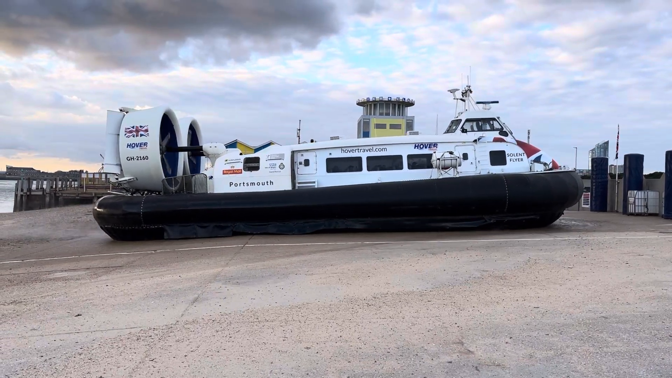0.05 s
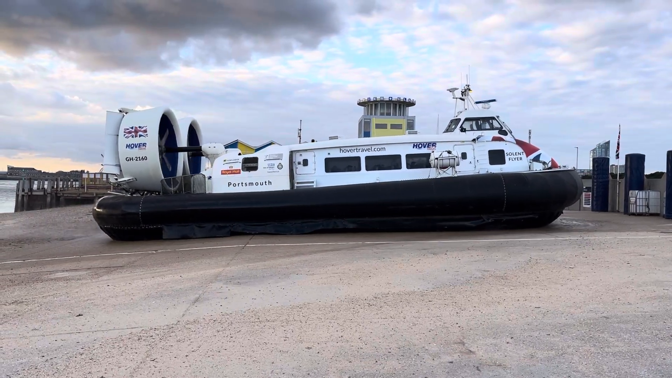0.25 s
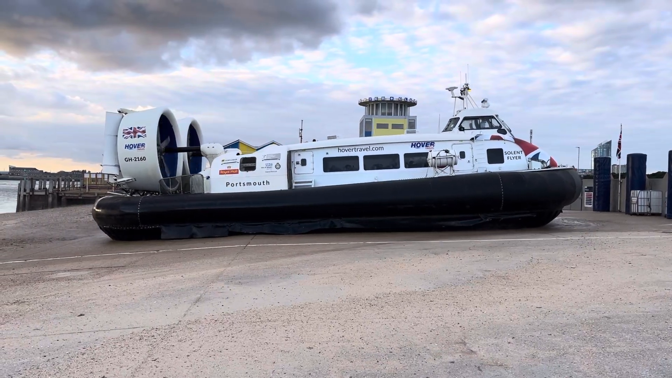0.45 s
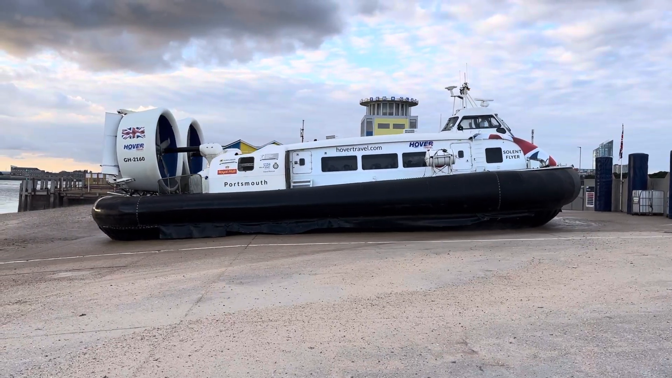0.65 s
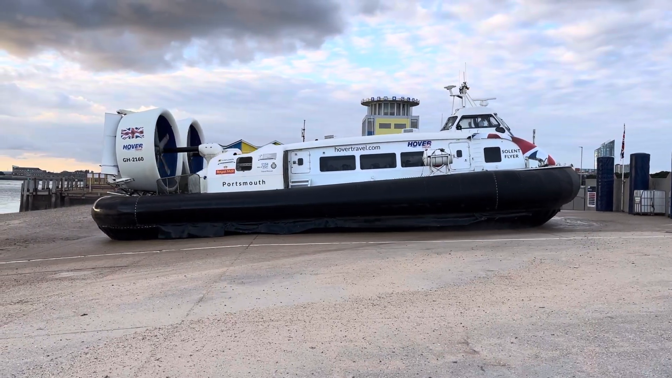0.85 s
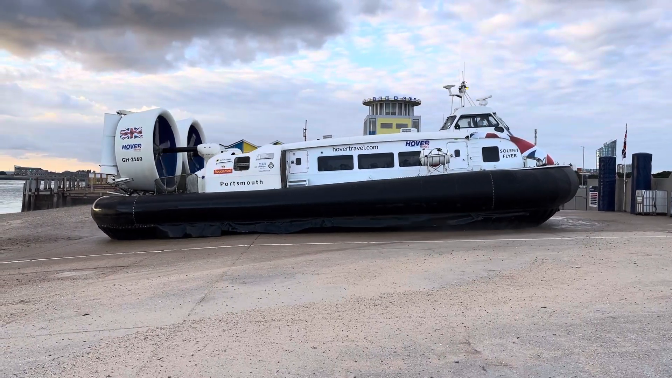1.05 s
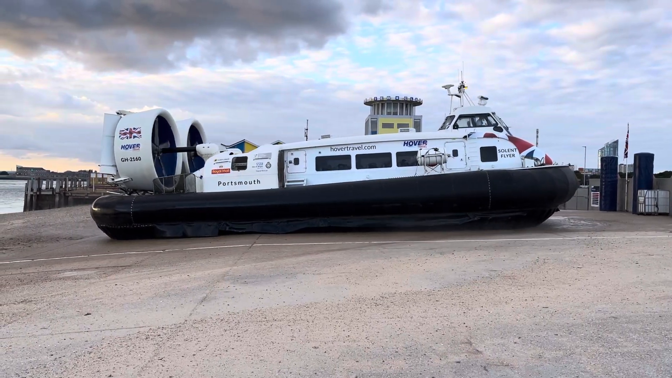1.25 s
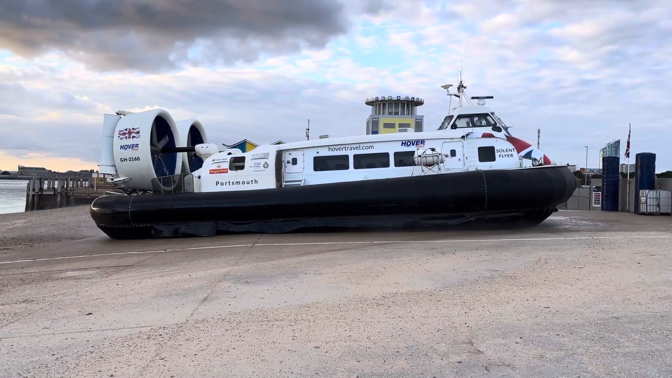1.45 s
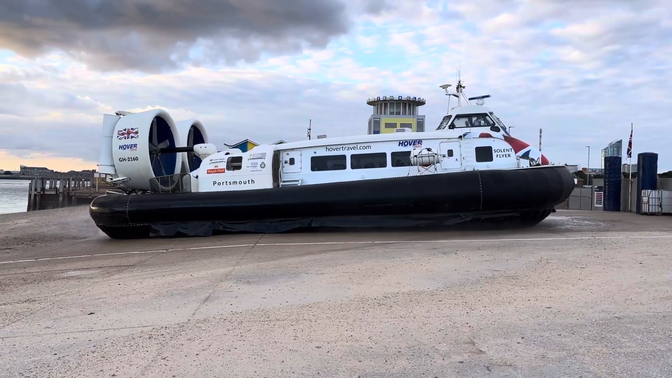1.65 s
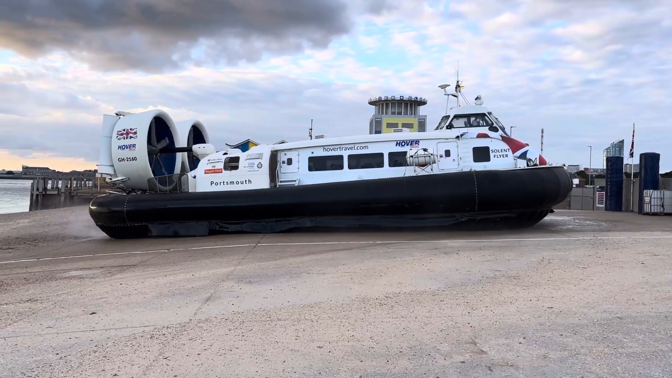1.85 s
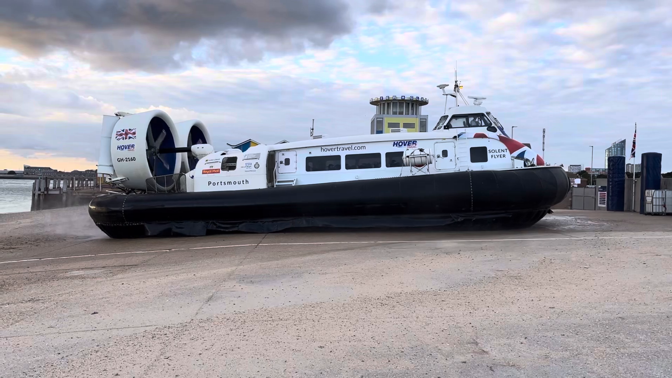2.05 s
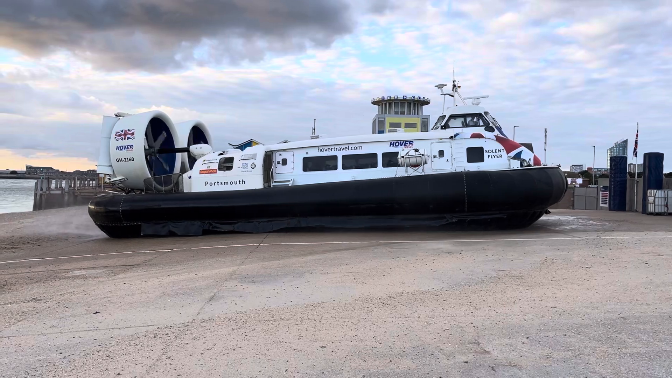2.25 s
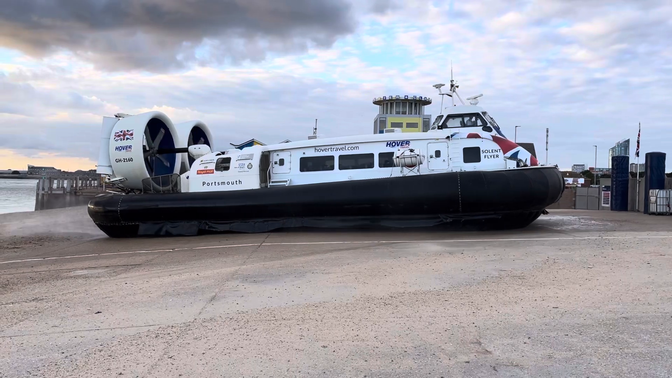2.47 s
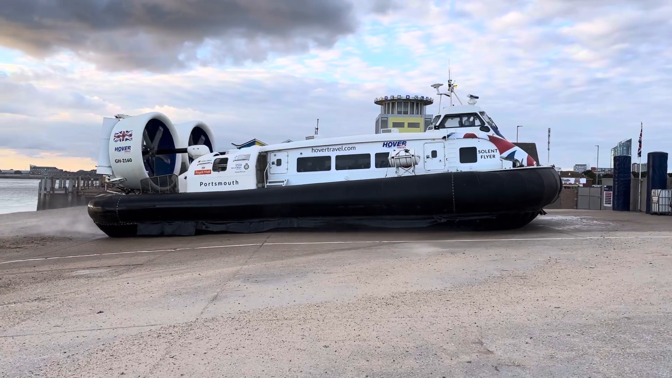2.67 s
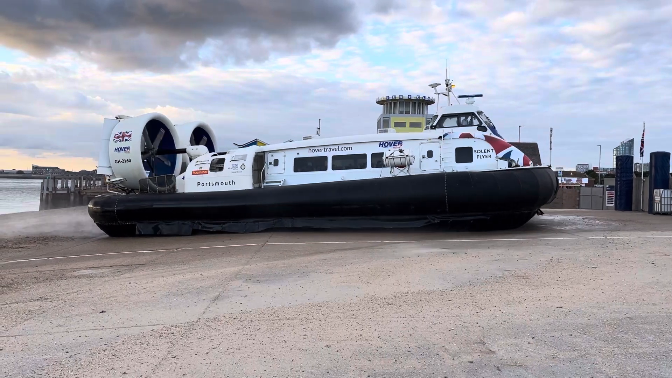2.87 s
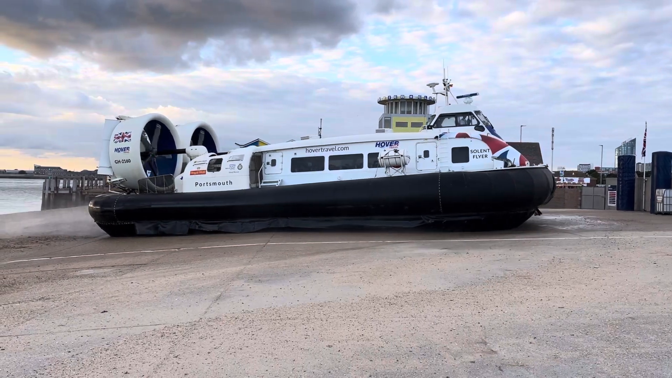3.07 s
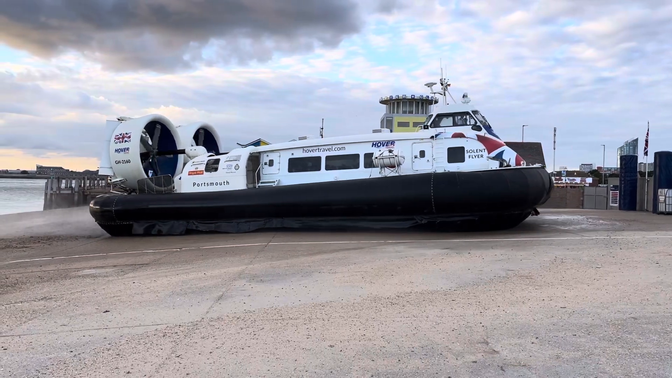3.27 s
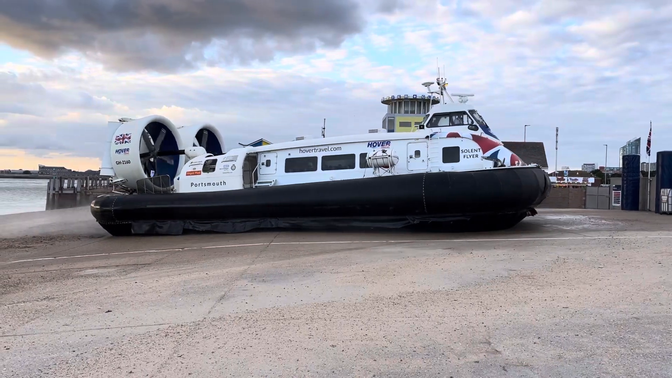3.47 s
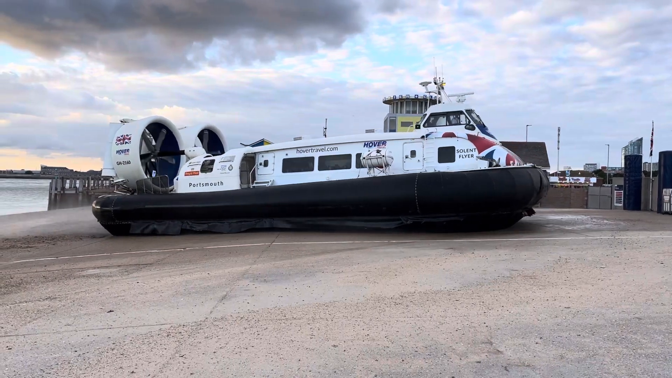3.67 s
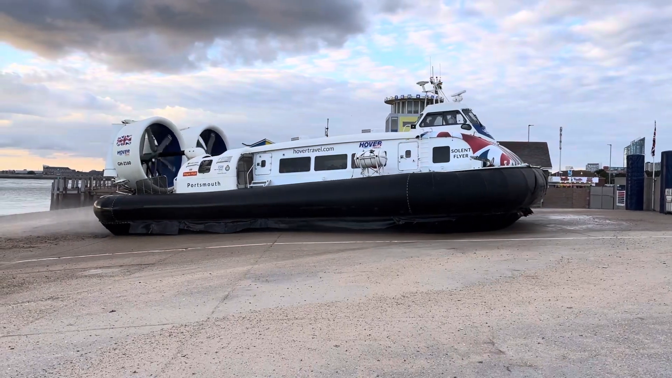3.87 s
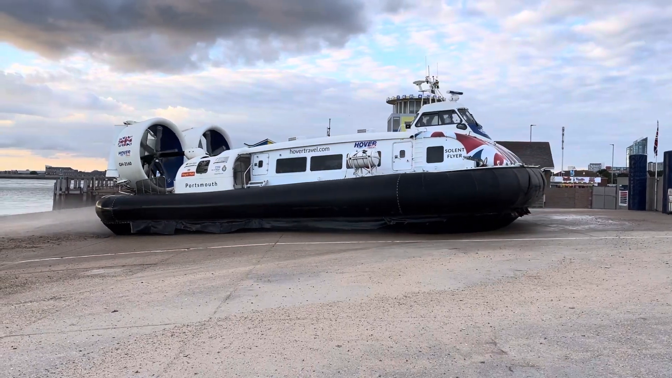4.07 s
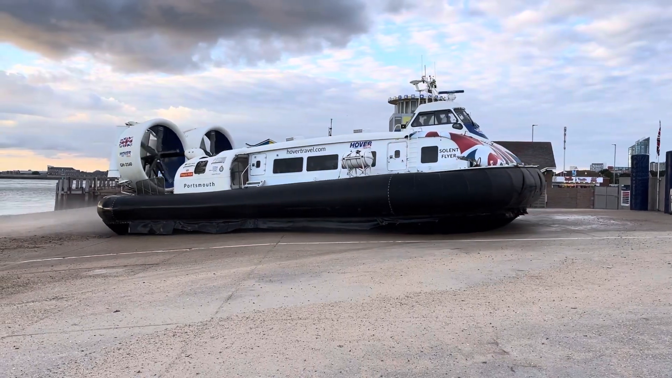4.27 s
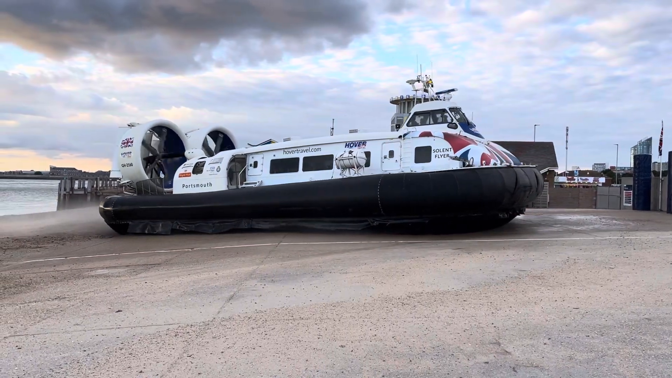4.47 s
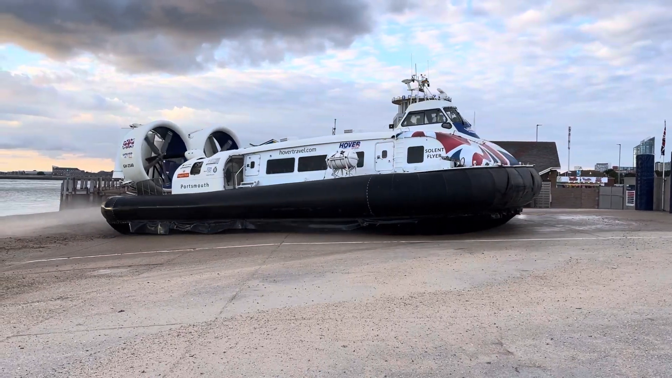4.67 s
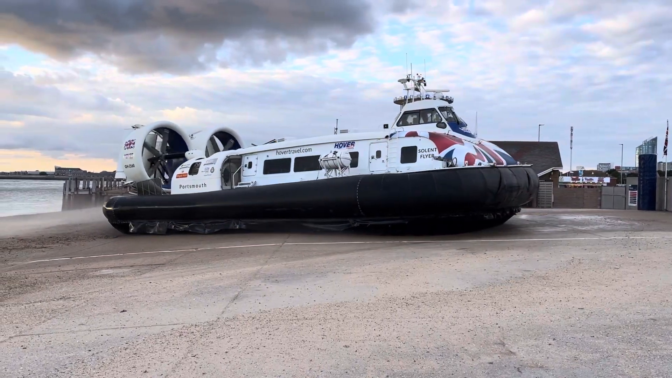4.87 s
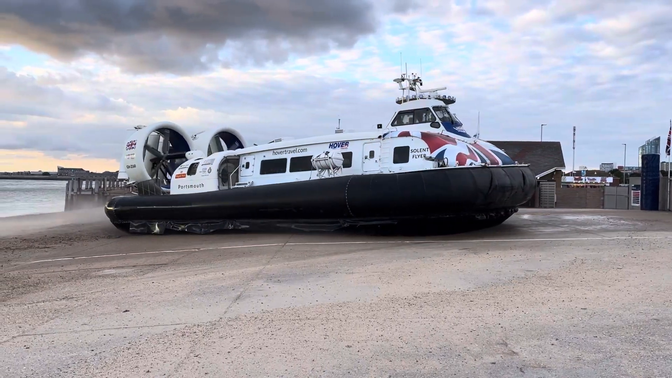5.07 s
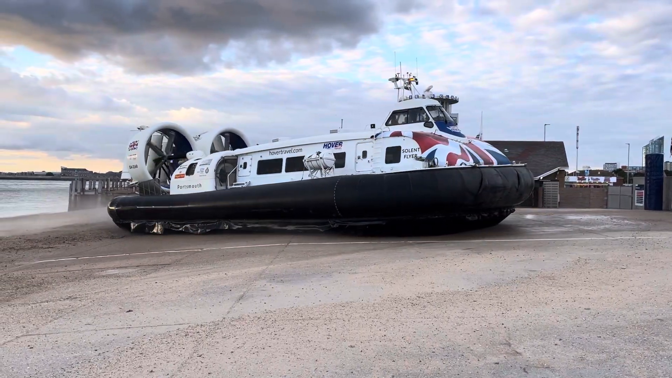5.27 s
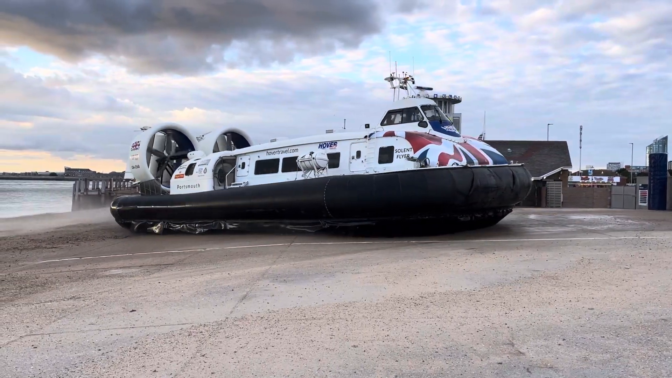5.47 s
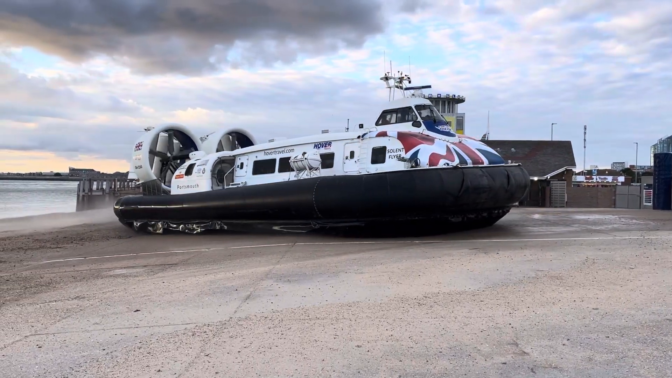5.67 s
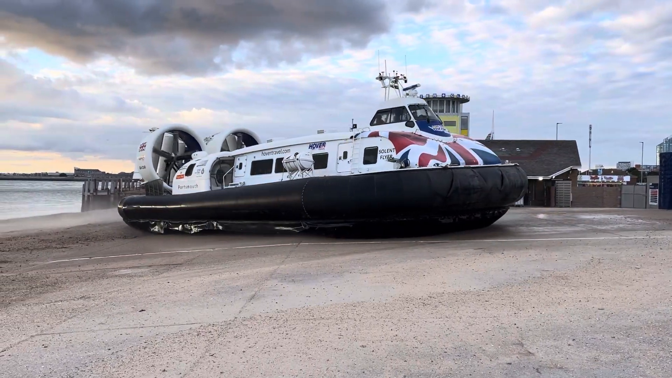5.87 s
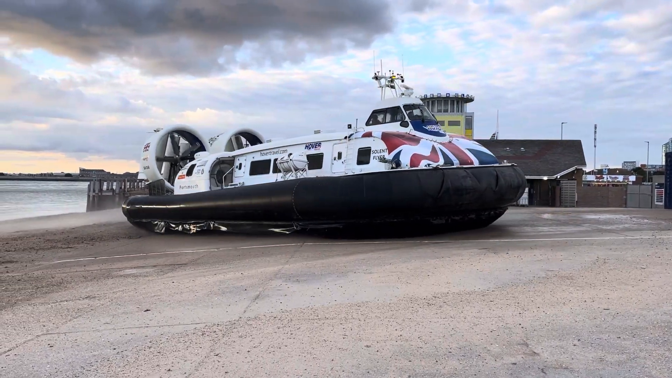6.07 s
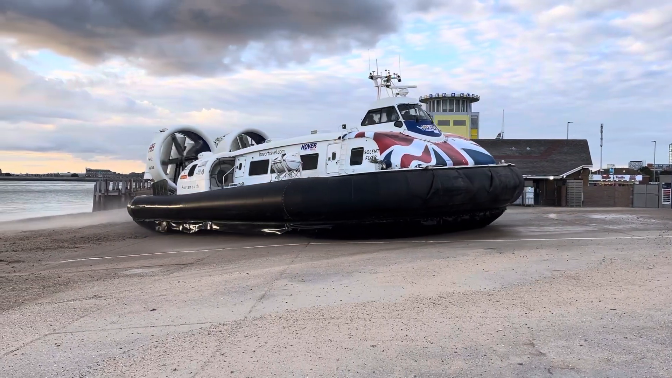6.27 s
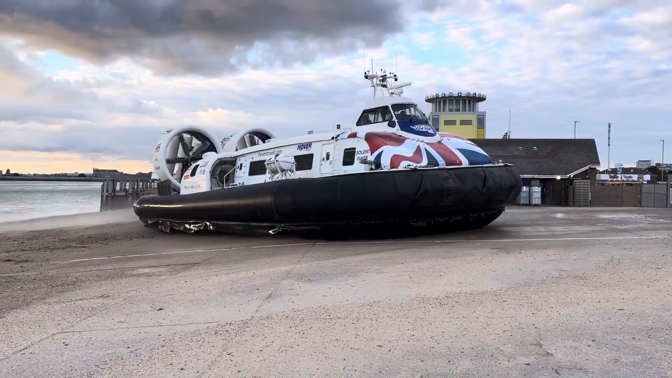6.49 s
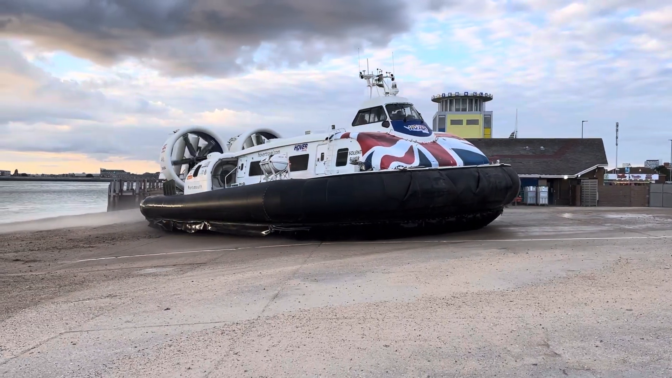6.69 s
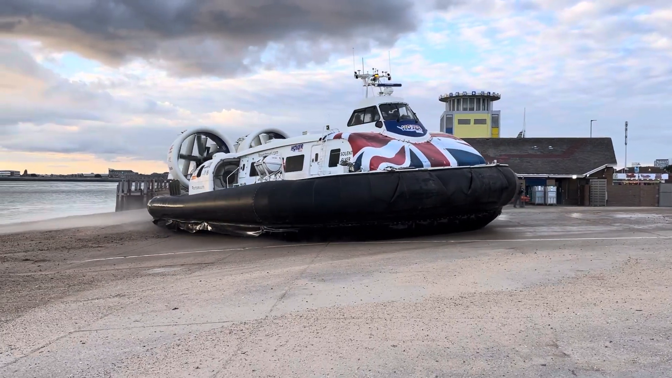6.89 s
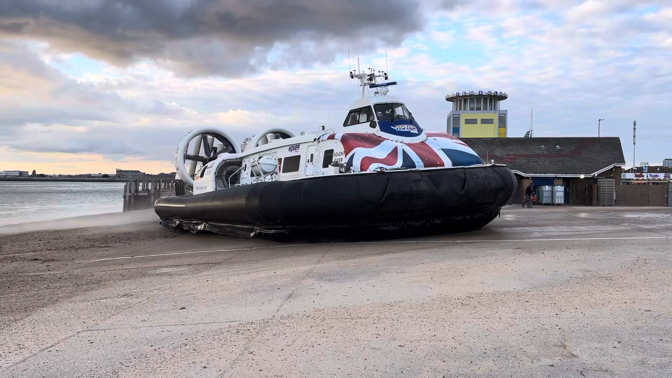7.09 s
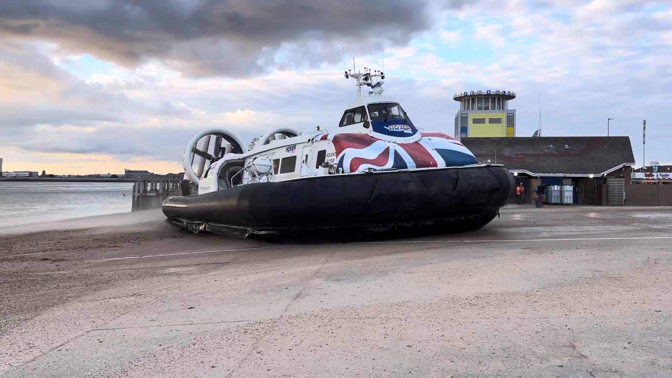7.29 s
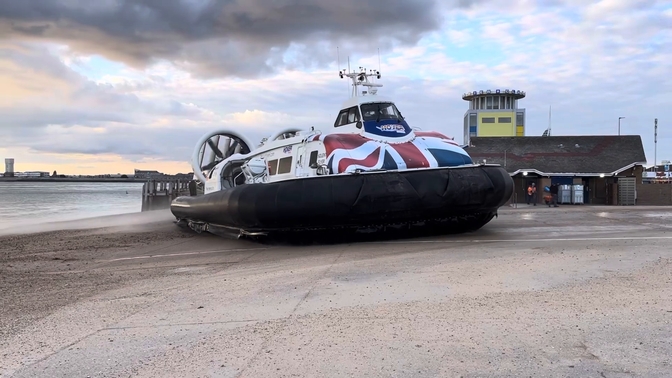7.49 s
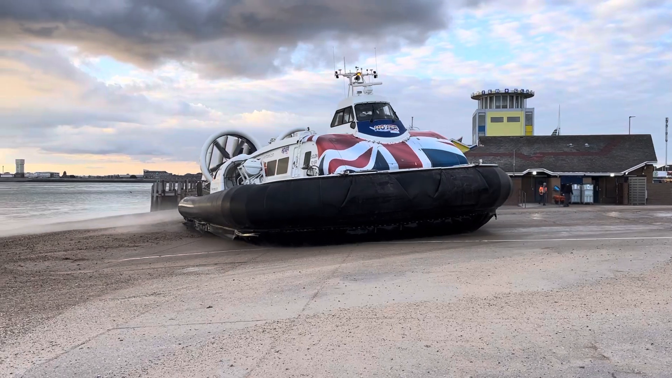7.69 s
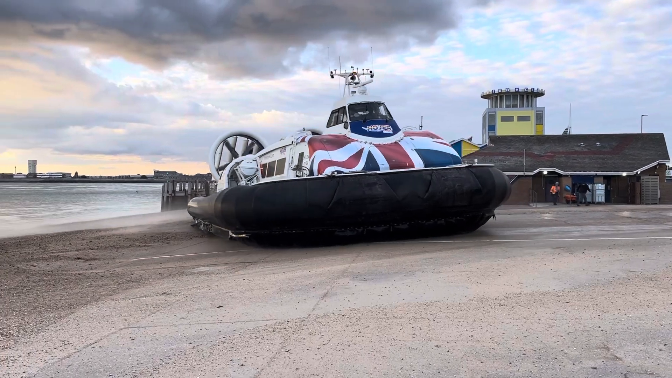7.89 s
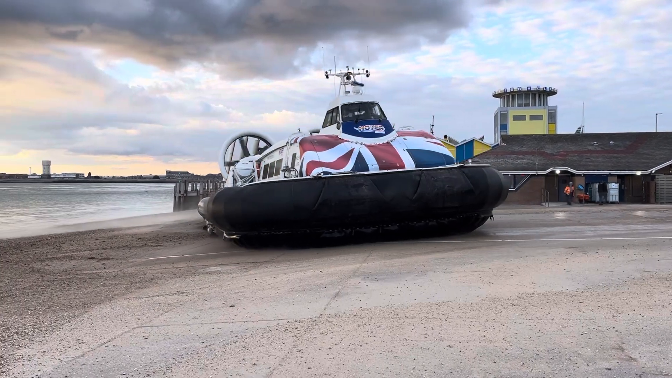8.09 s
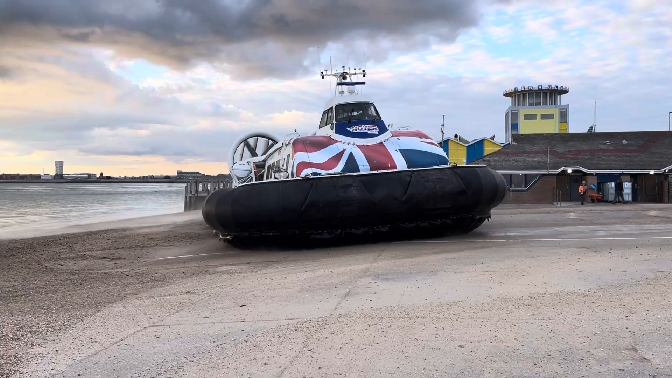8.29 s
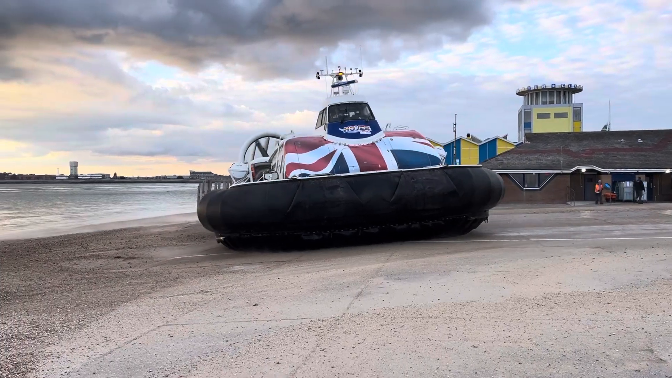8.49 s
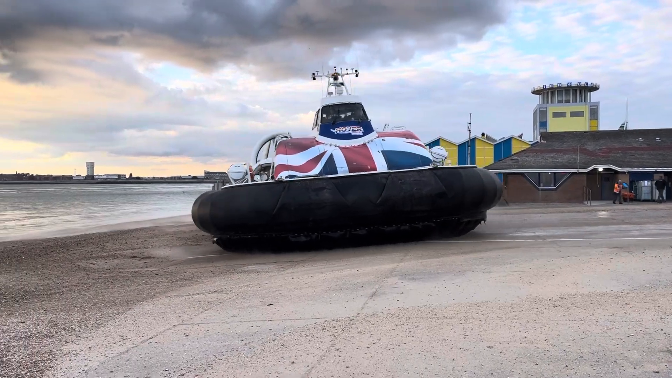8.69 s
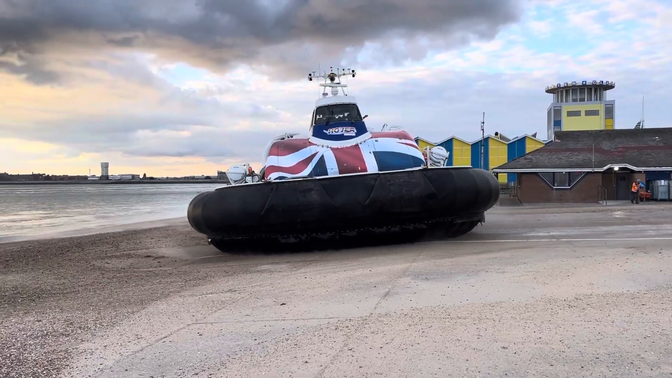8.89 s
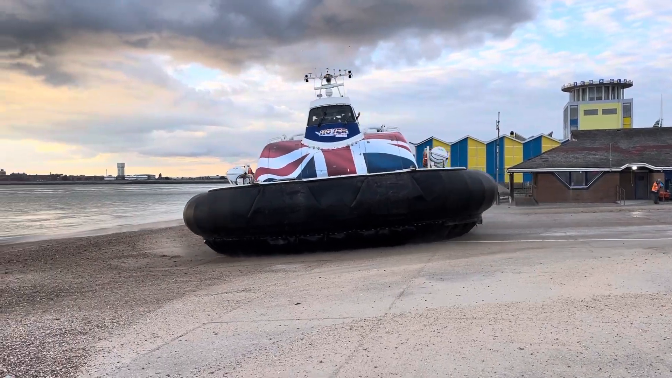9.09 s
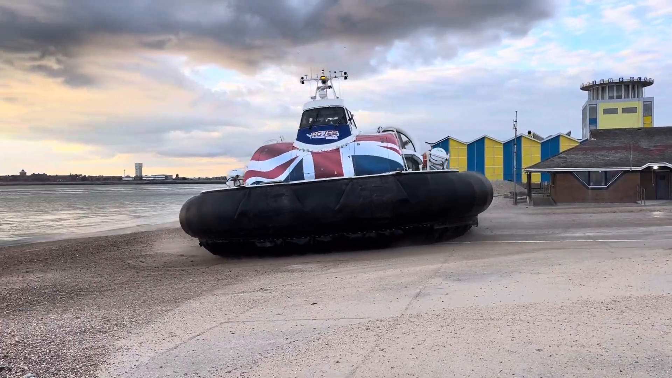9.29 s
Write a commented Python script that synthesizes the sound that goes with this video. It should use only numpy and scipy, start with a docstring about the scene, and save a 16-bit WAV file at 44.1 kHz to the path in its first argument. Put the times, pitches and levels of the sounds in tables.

```python
"""A hovercraft on its cushion turns on a concrete slipway by the sea, from side-on to bow-on.
Side-on, a twelve-cylinder diesel drones in wavering tones and ducted propellers throb and growl; noise roars
in the ducts, and air hisses from under the skirt, venting and flapping spray and grit over the concrete.
Midway the rush of air sinks briefly. Towards bow-on the lift fans' hum has come up, roar and hiss have faded,
and the exhaust is mostly shadowed; growls and vents return, then a last run of flaps."""
import sys
import numpy as np
from scipy import signal
from scipy.fft import rfft, irfft, next_fast_len
from scipy.io import wavfile
from scipy.ndimage import uniform_filter1d, minimum_filter1d

SR = 44100
rng = np.random.default_rng(int(sys.argv[2]) if len(sys.argv) > 2 else 0)


def file_out(sig):
    """Save sig as 16-bit WAV at sys.argv[1]."""
    # one column per channel
    cols = np.atleast_2d(sig).T
    # limit, then scale
    lim = np.clip(cols, -1, 1)
    pcm = np.round(lim * 32767).astype(np.int16)
    wavfile.write(sys.argv[1], SR, pcm)


N = 411894

CYLINDERS_PER_BANK = 6
# exhaust, shadowed once the hull has turned: (time [s], level before trim [dB])
EXHAUST_LEVEL = [(0.0, -12), (.33, -15.5), (.85, -14), (1.14, -18.5), (1.42, -16.5), (2.25, -21),
                 (3.1, -15.5), (3.5, -14.5), (4.35, -16.5), (4.7, -27.5), (5.49, -23.5), (5.74, -40),
                 (6.04, -29.5), (6.34, -23), (6.84, -33), (7.39, -35), (8.54, -36.5), (8.69, -25),
                 (9.34, -23)]
# weaker engine tones: (multiple of the engine cycle, relative level [dB],
# share that follows the exhaust's direction [0-1])
ENGINE_TONES = [(3, -19.5, 0), (5, -14, 0.4), (7, -15, 0.7), (8, -18.5, 0), (9, -18, 1), (10, -24.5, 1),
                (11, -22, 0.5), (12, -18, 0.08), (13, -16.5, 0.34), (15, -22, 0.1)]


def diesel(cycles, side_on_db=-19.5):
    """Unequal cylinders give wavering lines at multiples of the cycle; the bank firing tone is steadier."""
    exhaust_db, = in_time(EXHAUST_LEVEL)
    firing_tone = partial(CYLINDERS_PER_BANK * cycles, waver_db=.3, smear=.04, rate=3)
    out = firing_tone * from_db(exhaust_db + .4)
    for order, level_db, beamed in ENGINE_TONES:
        tone = partial(order * cycles, waver_db=2.5, smear=.098, rate=1.4)
        direction_db = beamed * (exhaust_db - side_on_db)
        out += tone * from_db(level_db + side_on_db + direction_db)
    return out


# throb at the blade rate: (time [s], level before trim [dB])
THROB_LEVEL = [(0.0, -47), (1.0, -23), (1.5, -23), (1.9, -20.5), (2.4, -34), (2.9, -40), (3.1, -25),
               (3.75, -24), (4.0, -47), (4.4, -21), (4.69, -29.5), (6.7, -30.5), (7.15, -23), (7.4, -32),
               (9.1, -41), (9.34, -23)]
# hum at twice the blade rate: (time [s], level before trim [dB])
HUM_LEVEL = [(0.0, -25.5), (0.9, -26), (1.55, -32.5), (2.15, -24.5), (3.1, -23.5), (3.4, -37),
             (3.65, -22.5), (4.05, -49), (4.5, -24.5), (5.0, -34.5), (5.2, -26.5), (5.5, -42), (5.79, -26),
             (6.39, -26), (6.64, -30.5), (9.34, -47)]
# third and fourth harmonics at rest [dB], relative to the upper harmonics' common level
THIRD_DB, FOURTH_DB = -1.5, -7.5
# growls under load: (time of peak [s], half length [s], rise of third harmonic [dB], rise of fourth [dB])
LOAD_GROWLS = [(.5, 0.22, 7.5, 14), (1.303, 0.17, 9.5, 7), (2.598, 0.48, -1, 10.5), (3.92, 0.33, 12, 14.5),
               (6.85, .3, 6.5, -5), (7.55, .4, 0.5, 1)]
# highest harmonics, each beamed in a lobe that sweeps past during the turn:
# (multiple of the blade rate, relative level [dB], rise inside the lobe [dB], heading of the lobe [degrees])
BEAMED_HARMONICS = [(5, -11.5, 9.5, 20.5), (6, -15, 10.5, 15), (7, -14.5, 3, 22), (8, -15.5, 10, 17)]
LOBE_HALF_DEGREES = 6.6


def propellers(blades, throb_db=-1.0, hum_db=1.6):
    """Blades chop the inflow; middle harmonics growl under load, the highest swell as their lobes pass."""
    throb_curve_db, = in_time(THROB_LEVEL)
    hum_curve_db, = in_time(HUM_LEVEL)
    out = partial(blades, waver_db=1.5, smear=.1, rate=2.2) * from_db(throb_curve_db + throb_db)
    out += partial(2 * blades, waver_db=1.0, smear=.16, rate=6.2) * from_db(hum_curve_db + hum_db)

    upper_db = facing(side_db=-33.5, oblique_db=-31.5, bow_db=-36.5)
    for order, level_db, growl_db in zip((3, 4), (THIRD_DB, FOURTH_DB), swells(LOAD_GROWLS)):
        tone = partial(order * blades, waver_db=.7, smear=.12, rate=2.1)
        out += tone * from_db(level_db + upper_db + growl_db)

    degrees, = in_time(HULL_HEADING)
    for order, level_db, lobe_db, lobe_degrees in BEAMED_HARMONICS:
        lobe = bell((degrees - lobe_degrees) / LOBE_HALF_DEGREES)
        tone = partial(order * blades, waver_db=1.3, smear=.06 * order, rate=2.1)
        out += tone * from_db(level_db + upper_db + lobe_db * lobe)
    return out


# low buffeting: (time [s], level before tilt [dB])
BUFFET_LEVEL = [(0, -19), (1.2, -19.5), (1.55, -21.3), (2.6, -21.5), (3.4, -20.5), (4.2, -23),
                (5.55, -23.5), (6.45, -23.5), (7.6, -20.5), (8.3, -24), (9.34, -23)]
# colours of the low buffeting, the roar and the rasp: (frequency [Hz], relative level per Hz [dB])
BUFFET_COLOUR = [(20, -28), (30, -16), (42, -8), (55, 1.5), (105, -1.5), (160, -3.5), (195, -1.5),
                 (240, -6), (320, -5), (390, -14), (700, -29.5)]
ROAR_COLOUR = [(250, -21), (400, -3), (480, -0.7), (700, 0), (880, -3), (1050, -8), (1600, -21)]
RASP_COLOUR = [(700, -13), (1000, -4), (1220, -1), (1450, -1), (1650, -3.5), (1870, -2.5), (2150, -8),
               (2450, -7.5), (2900, -16.5), (5000, -39)]


def duct_air(blades, lull_db, chop=.019, growl_chop=.012):
    """Buffeting, roar and rasp fade as the ducts turn away; blades chop the upper two, more so under load."""
    buffet_db, = in_time(BUFFET_LEVEL)
    growl_db, _ = swells(LOAD_GROWLS)
    roar_db = facing(side_db=-26.5, oblique_db=-27.0, bow_db=-30.5) + lull_db
    rasp_db = facing(side_db=-29.5, oblique_db=-29.5, bow_db=-33.0) + lull_db
    buffet_tilt_db = facing(side_db=1.0, oblique_db=1.5, bow_db=-2.5)
    roar_tilt_db = facing(side_db=-3.0, oblique_db=1.3, bow_db=-3.0)
    buffet = tilted(flow(BUFFET_COLOUR), buffet_tilt_db, pivot_hz=143) * from_db(buffet_db)
    roar = tilted(flow(ROAR_COLOUR), roar_tilt_db, pivot_hz=644) * from_db(roar_db)
    rasp = flow(RASP_COLOUR) * from_db(rasp_db)
    flutter = 1 + (chop + growl_chop * growl_db) * np.cos(2 * np.pi * blades)
    return buffet + through_ducts(roar + rasp) * flutter


# gusts of uneven inflow, negative where it slackens:
# (time of peak [s], build-up [s], centre at the peak [Hz], rise of the rush [dB])
INFLOW_GUSTS = [(.5, 1, 700, 3), (0.91, 0.12, 1800, 4.5), (1.52, 0.24, 560, 6.5), (1.71, 0.34, 1750, 4),
                (2.1, 0.066, 560, 2), (2.55, 0.83, 2100, -1.5), (2.66, 0.073, 540, 1),
                (3.87, 0.15, 1150, 2), (5.9, 0.58, 1100, 0.5), (6.72, 0.12, 550, 2.5),
                (7.35, 0.22, 900, 0.5)]
GUST_FALL = .45   # a gust collapses in this share of its build-up time
# duct resonances that shift with the turn:
# (side-on [Hz], bow-on [Hz], rise side-on [dB], rise at 45 degrees [dB], rise bow-on [dB])
DUCT_RESONANCES = [(800, 970, 2, 2, 0), (1150, 1300, 0.5, 1.5, 1), (1400, 1400, 0.5, -1, 2.5),
                   (1850, 2090, 2, 1.5, 4.5)]


def through_ducts(air, gust_octaves=.92, climb_octaves=.3, mode_octaves=.2,
                  eddy_octaves=.53, eddy_db=.76, eddy_rate=28, size=1024):
    """Gusts lift a broad climbing band, duct resonances shift with the turn, and eddies stir each band."""
    hz, t, frames = signal.stft(air, SR, nperseg=size)
    octave = np.log2(np.maximum(hz, 1))[:, None]
    at = np.minimum(t * SR, N - 1).astype(int)   # sample at each frame
    degrees, = in_time(HULL_HEADING)
    turned = degrees[at] / 90
    colour_db = np.zeros(frames.shape[1:])

    for s, build_s, centre_hz, rise_db in INFLOW_GUSTS:
        age = (t - s) / build_s
        strength = bell(np.maximum(-age, age / GUST_FALL))
        centre_octave = np.log2(centre_hz) + climb_octaves * age
        colour_db += rise_db * strength * bell((octave - centre_octave) / gust_octaves)

    for side_hz, bow_hz, *rise_db in DUCT_RESONANCES:
        mode_hz = side_hz + (bow_hz - side_hz) * turned
        colour_db += facing(*rise_db)[at] * bell((octave - np.log2(mode_hz)) / mode_octaves)

    for centre_hz in np.geomspace(450, 2200, 5):
        eddy = eddy_db * drift(eddy_rate)[at]
        colour_db += eddy * bell((octave - np.log2(centre_hz)) / eddy_octaves)
    return signal.istft(frames * from_db(colour_db), SR, nperseg=size)[1][:, :N]


# the skirt lifts and vents:
# (time of peak [s], half length [s], rise of the air jets [dB], rise of the spray and grit [dB])
SKIRT_VENTS = [(.35, 0.74, 4.5, 2.5), (1.15, 0.29, 2, 2), (1.65, 0.14, 2.5, 3.2), (4.12, 0.6, 3.5, 2.5),
               (5.63, 0.26, 4.5, 0.2), (7.12, 0.39, 3.5, 1), (8.55, 0.43, 1.5, 0.5)]
HISS_FOLLOWS = .61   # share of a vent's jet rise that the broad hiss follows
# colours of the hiss, air jets, spray and grit: (frequency [Hz], relative level per Hz [dB])
HISS_COLOUR = [(1500, -20), (2400, -4), (2800, -2), (3050, 0), (3400, -1.5), (4000, -2), (5000, -5.5),
               (5600, -11), (7000, -22), (9000, -35)]
JETS_COLOUR = [(4300, -25), (5200, -7), (6100, 0), (6800, 0), (7450, -3), (8100, -13), (9000, -28)]
SPRAY_COLOUR = [(6500, -20), (7600, -5), (8200, -4), (8600, 0), (9200, 1), (10800, -3), (11800, -13),
                (13500, -30)]
GRIT_COLOUR = [(9000, -28), (10800, 8), (11600, 4.5), (13500, 3.5), (13900, 3), (15100, -5), (15700, -6)]


def skirt_air(lull_db, flutter_db=.95, flutter_rate=18.0, grain_db=.7):
    """The flapping skirt lets air out in quick puffs and longer vents, which throw grainy spray and grit."""
    vent_db, thrown_db = swells(SKIRT_VENTS)
    puffs_db = flutter_db * drift(flutter_rate)

    hiss_db = facing(side_db=-34.5, oblique_db=-35.5, bow_db=-42.0)
    hiss_db = hiss_db + HISS_FOLLOWS * vent_db + lull_db + .5 * puffs_db
    jets_db = facing(side_db=-41.5, oblique_db=-40.0, bow_db=-47)
    jets_db = jets_db + vent_db + .5 * puffs_db + 1.0 * drift(21)
    spray_db = facing(side_db=-46.5, oblique_db=-48.5, bow_db=-52.0)
    spray_db = spray_db + thrown_db + puffs_db + 1.3 * drift(40)
    grit_db = facing(side_db=-49, oblique_db=-51.5, bow_db=-55.5)
    grit_db = grit_db + thrown_db + .61 * puffs_db + grain_db * drift(60)

    hiss_tilt_db = facing(side_db=-2.5, oblique_db=.9, bow_db=3.5)
    spray_tilt_db = facing(side_db=-4, oblique_db=-4, bow_db=-8)
    hiss = tilted(flow(HISS_COLOUR), hiss_tilt_db, pivot_hz=3670) * from_db(hiss_db)
    jets = flow(JETS_COLOUR) * from_db(jets_db)
    spray = tilted(flow(SPRAY_COLOUR), spray_tilt_db, pivot_hz=9300) * from_db(spray_db)
    grit = flow(GRIT_COLOUR) * from_db(grit_db)
    return hiss + jets + spray + grit


# short runs of flaps:
# (time of strongest flap [s], half length of run [s], centre of the spray [Hz], level before unevenness [dB])
FLAP_RUNS = [(.18, .13, 11800, -42), (.46, .17, 11800, -44), (4.395, 0.097, 7300, -40),
             (8.53, 0.41, 7800, -43.5)]
FLAP_S, SPIT_HALF_S = .072, .025   # mean time between flaps, half length of a spit
SPIT_WIDTH = 1.35   # frequency ratio from the centre of a spit's band to its -20 dB points


def spits(uneven_db=2.0, late_s=.005):
    """Each skirt flap spits a burst of spray, uneven in strength and timing; a run swells and dies away."""
    t = np.arange(N) / SR + late_s * drift(3)
    out = 0
    for s, half_s, centre_hz, level_db in FLAP_RUNS:
        since_flap = (t - s + FLAP_S / 2) % FLAP_S - FLAP_S / 2
        spray = flow([(centre_hz / SPIT_WIDTH, -20), (centre_hz, 0), (centre_hz * SPIT_WIDTH, -20)])
        run = bell((t - s) / half_s)
        out = out + spray * from_db(level_db) * run * bell(since_flap / SPIT_HALF_S)
    return out * from_db(uneven_db * drift(8))


# the fan intake comes round: (time [s], level common to both fans [dB])
FAN_LEVEL = [(0, -41), (1.8, -36), (3.0, -31.5), (4.3, -30), (5.4, -30.5), (6.2, -27), (7.6, -29),
             (8.2, -31.5), (9.34, -29)]
FAR_FAN_SPEED = .993   # as a share of the near fan's speed


def lift_fans(vanes, near_db=-2.0, far_db=-10.0):
    """Passing vanes hum: the near fan steadily; the far one runs a little slower and beats against it."""
    fan_db, = in_time(FAN_LEVEL)
    near = partial(vanes, waver_db=.5, smear=.15, rate=2.5) * from_db(near_db)
    far = partial(vanes * FAR_FAN_SPEED, waver_db=1.0, smear=.5, rate=1.8) * from_db(far_db)
    return (near + far) * from_db(fan_db)


# the turn: (time [s], angle from side-on, 90 being bow-on [degrees])
HULL_HEADING = [(0, 0), (2, 10), (5.4, 45), (9.34, 90)]


def facing(side_db, oblique_db, bow_db):
    """A level that changes smoothly as the hull turns through side-on, 45 degrees and bow-on."""
    degrees, = in_time(HULL_HEADING)
    parabola = np.polyfit([0, 45, 90], [side_db, oblique_db, bow_db], 2)
    return np.polyval(parabola, degrees)


# the microphone pair: (frequency [Hz], phase by which left leads [rad], left-right likeness [0-1])
PORT_PHASE = [(60, 0, .998), (250, 0, .92), (850, 0, .92), (1070, .8, .68), (1300, .2, .72),
              (1630, 1.45, .55), (2000, .3, .82), (2500, 0, .98), (2900, 0, .999), (5100, 0, .995),
              (5350, -1.6, .75), (5540, -3.14, 1), (6630, -3.14, 1), (6840, -6.28, .999),
              (8220, -6.28, .99), (8320, -5, .67), (9000, -4.3, .72), (9480, -3.14, .993),
              (10420, -3.14, .993), (10550, -2.25, .66), (11650, -.7, .63), (11780, 0, .999),
              (13050, 0, .999), (13150, .7, .65), (13600, 1.6, .48), (14200, 3.14, 1)]
# stereo balance: (frequency [Hz], left minus right [dB])
PORT_BALANCE = [(30, 1), (100, 1.8), (400, 1.8), (580, 3.2), (950, .7), (1200, 4), (1800, 4.6), (2400, 0)]


def microphones(direct, scattered):
    """Scattered sound differs between the ports; their phase and balance change with frequency."""
    lead, alike = over_hz(PORT_PHASE)
    balance_db, = over_hz(PORT_BALANCE)
    alike = np.clip(alike, 0, 1)
    sides = np.array([[1], [-1]])   # left, right
    shared = filtered(direct, np.sqrt((1 + alike) / 2))
    opposed = sides * filtered(scattered, np.sqrt((1 - alike) / 2))
    return filtered(shared + opposed, from_db(sides * balance_db / 2) * np.exp(.5j * sides * lead))


def partial(turns, waver_db, smear, rate):
    """A tone, rms 1 before its level [dB] and phase [rad] waver in the moving air."""
    phase = 2 * np.pi * (turns + rng.random()) + smear * drift(rate)
    return np.sqrt(2) * np.sin(phase) * from_db(waver_db * drift(rate))


def flow(spectrum):
    """Two unrelated turbulent noises of one colour: the direct sound and the scattered sound."""
    below = (spectrum[0][0] / 2, -80)
    above = (spectrum[-1][0] * 2, -80)
    colour_db, = over_hz([below] + list(spectrum) + [above])
    return rms_one(filtered(rng.standard_normal((2, N)), from_db(colour_db)))


def drift(rate):
    """Slow chance with spread 1, changing about rate times a second."""
    r = np.exp(-80 * np.pi * rate / SR)   # one step is 40 samples
    noise = rng.standard_normal(N // 40 + 2002)
    slow = signal.lfilter([1], [1, -2 * r, r * r], noise)[2000:]   # drop the filter's start
    return np.interp(np.arange(N) / 40, np.arange(len(slow)), rms_one(slow))


def swells(events):
    """Each event rises and falls as a bell; one dB curve for each of its strengths."""
    t = np.arange(N) / SR
    return sum(np.outer(rise_db, bell((t - s) / half_s)) for s, half_s, *rise_db in events)


def bell(x):
    """A bell of height 1 that falls to 1/e one unit from its centre."""
    return np.exp(-x ** 2)


def tilted(x, tilt_db, pivot_hz):
    """Raise the band above a pivot frequency by half the tilt and lower the band below by the other half."""
    lower, = over_hz([(pivot_hz / 1.12, 1), (pivot_hz * 1.12, 0)])
    bass = filtered(x, lower)
    return bass * from_db(-tilt_db / 2) + (x - bass) * from_db(tilt_db / 2)


def filtered(x, response):
    """Apply a response given per frequency bin."""
    size = next_fast_len(N, True)
    return irfft(rfft(x, size) * response, size)[..., :N]


def in_time(rows):
    """One curve per column, a value for every sample."""
    s, *columns = np.transpose(rows)
    return [np.interp(np.arange(N) / SR, s, c) for c in columns]


def over_hz(rows):
    """One curve per column, a value for every frequency bin."""
    size = next_fast_len(N, True)
    hz, *columns = np.transpose(rows)
    bins = np.maximum(np.arange(size // 2 + 1) * SR / size, 1)
    return [np.interp(np.log(bins), np.log(np.sort(hz)), c) for c in columns]


def from_db(db):
    """Decibels to gain."""
    return 10 ** (np.asarray(db) / 20)


def rms_one(x):
    """Scale to rms 1."""
    return x / np.sqrt(np.mean(x ** 2) + 1e-20)


# the governor hunts slowly: (time [s], firing rate of one cylinder bank [Hz])
FIRING_RATE = [(0.0, 87.1), (0.25, 87.43), (0.95, 90.17), (1.1, 91.22), (1.55, 89.83), (2.0, 87.88),
               (2.25, 88.4), (3.2, 87.8), (3.55, 88.51), (3.76, 89.85), (4.1, 90.84), (6.34, 87.58),
               (6.79, 88.98), (7.34, 90.67), (9.34, 89.34)]
# blade rate at mean engine speed, and the exponent with which it follows the engine's speed swing
BLADE_HZ, BLADES_FOLLOW = 69.9, .9
VANES_PER_FIRING = 3.42   # lift fan vanes that pass per firing
# the rush of air sinks briefly midway through the turn
LULL_S, LULL_HALF_S, LULL_DB = 4.77, .67, -2


def scene():
    """One engine speed drives all the tones, which ride on the rush of air."""
    firing_hz, = in_time(FIRING_RATE)
    firings = np.cumsum(firing_hz) / SR
    blade_hz = BLADE_HZ * (firing_hz / firing_hz.mean()) ** BLADES_FOLLOW
    blades = np.cumsum(blade_hz) / SR
    drone = diesel(firings / CYLINDERS_PER_BANK) + propellers(blades)
    drone = drone + lift_fans(VANES_PER_FIRING * firings)
    lull_db, = swells([(LULL_S, LULL_HALF_S, LULL_DB)])
    direct, scattered = duct_air(blades, lull_db) + skirt_air(lull_db) + spits()
    return microphones(direct + drone, scattered)


CUTOFF_HZ = 15750


def record(dry, size=441):
    """A limiter eases down the highest peaks and the top is cut steeply."""
    room = np.minimum(1, .92 / (np.abs(dry).max(axis=0) + 1e-9))
    gain = uniform_filter1d(minimum_filter1d(room, size), size)
    pass_db, = over_hz([(CUTOFF_HZ, 0), (CUTOFF_HZ + 200, -90)])
    return filtered(dry * gain, from_db(pass_db))


dry = scene()
out = record(dry)
file_out(out)
```